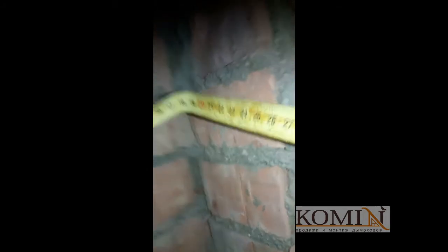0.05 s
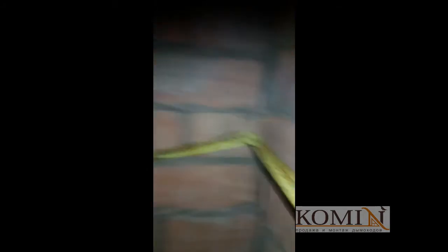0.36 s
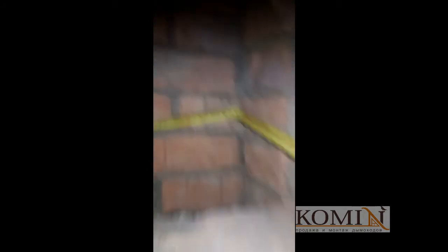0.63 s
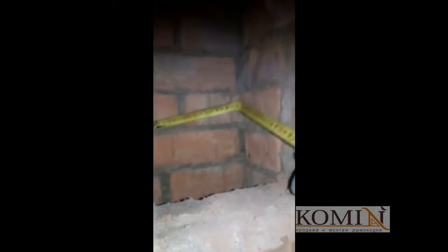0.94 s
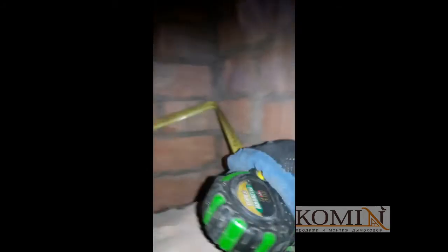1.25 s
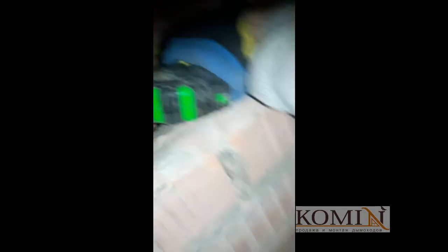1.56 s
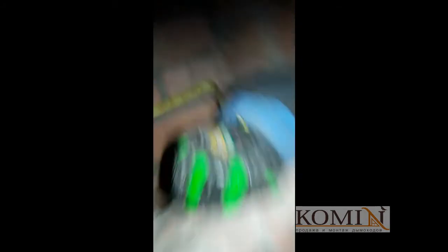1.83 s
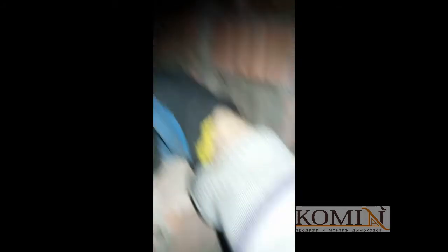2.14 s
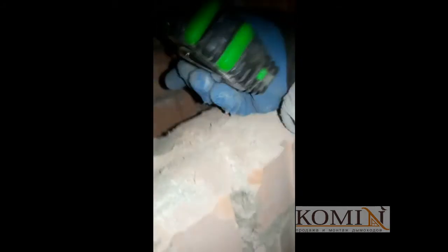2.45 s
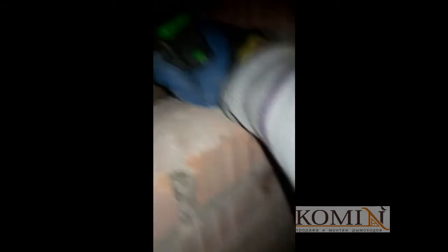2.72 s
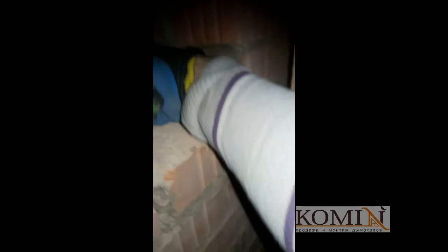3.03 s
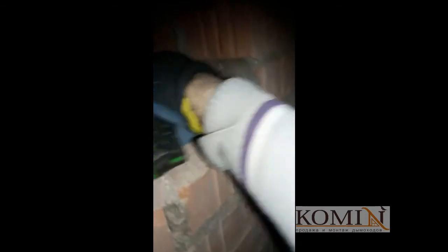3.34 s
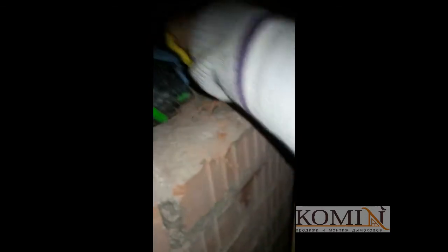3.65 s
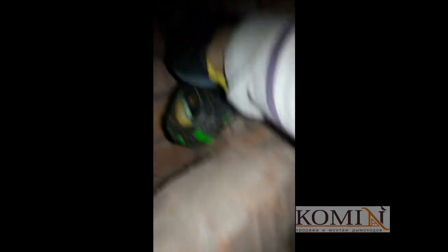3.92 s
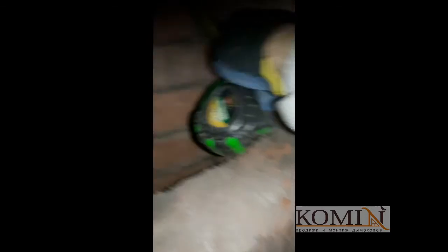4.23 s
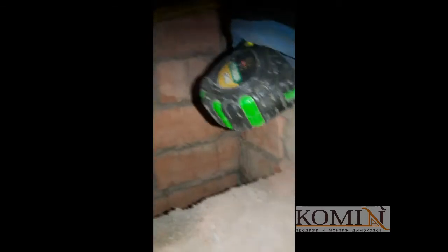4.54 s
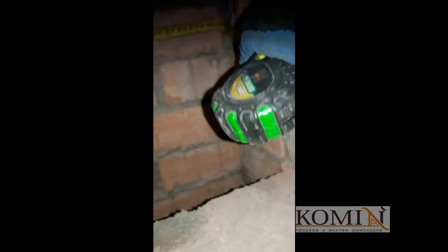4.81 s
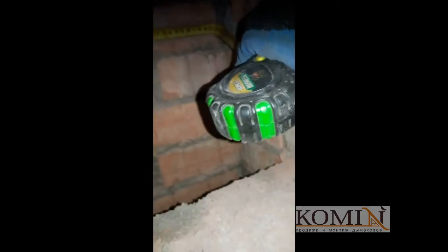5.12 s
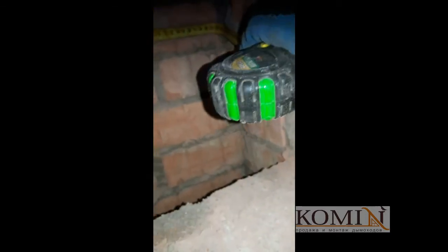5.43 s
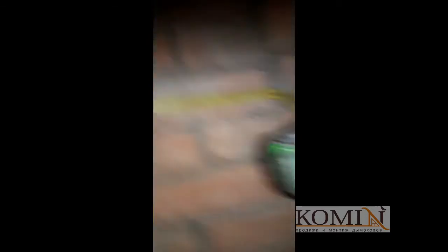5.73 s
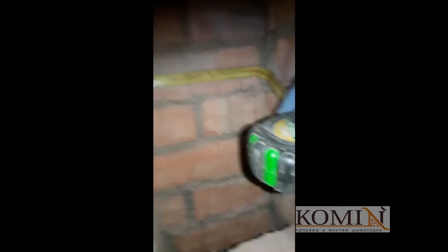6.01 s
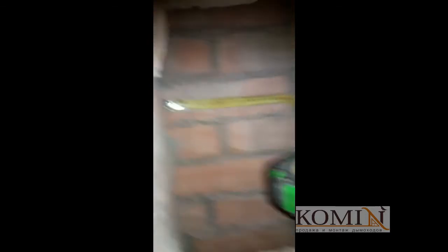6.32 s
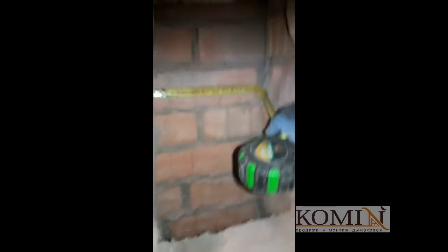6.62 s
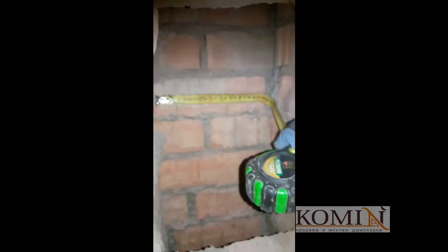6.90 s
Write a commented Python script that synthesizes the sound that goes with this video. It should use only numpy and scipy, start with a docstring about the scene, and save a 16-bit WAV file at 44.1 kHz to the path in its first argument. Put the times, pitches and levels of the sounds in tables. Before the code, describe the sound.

A sharp, ringing steel clatter opens among dull knocks and rubbing on a hand-held microphone. After a short lull, a tape measure blade slaps, chatters and scrapes against brick in irregular bursts, while a sleeve brushes the opening and the plastic case scuffs the edge. It ends with light taps of the end hook. Everything is close, with the short, dense echo of a narrow shaft over a low hush.

```python
"""First comes a sharp steel clatter among dull knocks and rubbing: a tape measure is worked into a narrow
brick shaft while the hand-held camera is moved in close. The thin blade slaps, chatters and scrapes on
the bricks, which makes the steel ring; near the end it is mostly light taps of its end hook. A sleeve
brushes the opening and the plastic case scuffs the edge. The shaft answers with a short, dense echo.
Behind it all, a low hush with soft handling noise swells and fades. Left and right are almost the same."""
import sys
import numpy as np
from scipy import signal
from scipy.fft import rfft, irfft, next_fast_len
from scipy.io import wavfile
from scipy.ndimage import uniform_filter1d, map_coordinates

SR = 44100
rng = np.random.default_rng(int(sys.argv[2]) if len(sys.argv) > 2 else 0)


def pcm_store(signal):
    """Save signal as 16-bit PCM."""
    levels = np.round(np.clip(np.atleast_2d(signal), -1, 1) * 32767)
    wavfile.write(sys.argv[1], SR, levels.astype(np.int16).T)


N = 315756

# Levels in all tables are relative. A fade_s is the time a sound takes to fall by 60 dB.
# the end hook taps the wall: start_s, level_db, brightness_db, pitch_hz
HOOK_TAPS = [(1.2476, -59.5, -16.5, 2497), (1.334, -62, -17, 1350), (1.49, -52, -3, 1320),
             (2.6847, -46.5, -6, 2360), (4.1298, -47, 5, 1680), (5.1703, -54.5, -11.5, 1645),
             (5.341, -53.5, 20.5, 1670), (5.4819, -46, 14, 1725), (5.5902, -45, 4, 1840),
             (5.6736, -49, 6, 1770), (5.7061, -53, -1, 1273), (5.8564, -56.5, 4.5, 1732),
             (6.301, -55.5, -6.5, 1500), (6.6006, -56.5, 12.5, 2330), (6.7499, -47.5, -3.5, 1503),
             (6.8002, -60, -6, 1507), (6.9014, -46.5, 3, 2116), (7.1113, -54, -2.5, 2360)]
# the blade drags over brick: start_s, length_s, level_db
BLADE_SCRAPES = [(0.0, 0.13, -46), (0.186, .13, -55), (1.595, .1, -39), (1.935, 0.027, -52),
                 (1.977, .05, -41.5), (2.372, .07, -40.5), (2.466, 0.25, -52.5), (2.77, 0.067, -28),
                 (3.014, 0.1, -44.5), (3.242, .125, -38.5), (3.422, 0.053, -53), (3.557, .06, -50),
                 (3.629, .125, -41.5), (3.801, 0.29, -54), (3.977, .065, -37.5), (4.137, 0.21, -67),
                 (4.38, .275, -47.5), (4.712, 0.26, -69), (4.818, 0.055, -62), (4.957, 0.18, -66.5),
                 (5.248, .15, -75), (5.615, 0.14, -64.5), (5.746, 0.16, -77)]


def amp(db):
    """Turn decibels into a gain."""
    return 10 ** (np.asarray(db) / 20)


def unit(x):
    """Scale a signal to an average power of 1."""
    return x / np.sqrt(np.mean(x ** 2) + 1e-20)


def along(points, hz):
    """Read a curve of (pitch_hz, value) points on a log pitch axis."""
    pitches, values = np.transpose(points)
    return np.interp(np.log(hz + 1), np.log(pitches + 1), values)


def peaks(resonances, hz):
    """Summed gain of (pitch_hz, width_hz, level_db) resonances."""
    return sum(amp(db) / np.sqrt(1 + (2 * (hz - centre) / width) ** 4)
               for centre, width, db in resonances)


def add(track, s, sound):
    """Mix a sound into a track at s seconds."""
    start = max(0, round(s * SR))
    track[start:start + len(sound)] += sound[:N - start]


def coloured(x, gain):
    """Filter by gain(hz), with no ringing ahead of the sound."""
    size = 2 * next_fast_len((N + SR // 4) // 2)
    hz = np.fft.rfftfreq(size, 1 / SR)
    cepstrum = irfft(np.log(np.maximum(gain(hz), 1e-6)), size)
    cepstrum[1:size // 2] *= 2
    cepstrum[size // 2 + 1:] = 0
    return irfft(rfft(x, size) * np.exp(rfft(cepstrum)), size)[..., :N]


def noise(spectrum):
    """Noise shaped by (pitch_hz, level_db) points."""
    return unit(coloured(rng.standard_normal(N), lambda hz: amp(along(spectrum, hz))))


def wobble(per_s):
    """A smooth curve through per_s random values a second."""
    values = rng.standard_normal(N // 16)
    coarse = np.arange(0, N, 8)
    curve = map_coordinates(values, [coarse * per_s / SR], mode="wrap")
    return np.interp(np.arange(N), coarse, curve)


def wavering_tone(t, hz, width_hz):
    """One resonance shaken at random; a wider one sounds rougher."""
    memory = np.exp(-np.pi * width_hz / SR)
    shaking = rng.standard_normal((2, len(t) + SR // 20))
    drift = signal.lfilter([1 - memory], [1, -memory], shaking)[:, -len(t):]
    phase = 2 * np.pi * hz * t
    return unit(drift[0] * np.cos(phase) + drift[1] * np.sin(phase))


def shifting_noise(depth_db):
    """Noise in which pitches briefly stand out, as when a contact point moves."""
    spectra = signal.stft(rng.standard_normal(N), nperseg=512)[2]
    patches = uniform_filter1d(rng.standard_normal(spectra.shape), size=3, axis=0)
    patches = unit(uniform_filter1d(patches, size=9, axis=1))
    return unit(signal.istft(spectra * amp(depth_db * patches), nperseg=512)[1][:N])


def strokes(rows, rise_s, release_s):
    """A loudness curve that rises, holds and dies away for each row."""
    t = np.arange(N) / SR
    return sum(amp(db) * (1 - np.exp(-np.maximum(t - s, 0) / rise_s))
               * np.exp(-np.maximum(t - s - length, 0) / release_s) for s, length, db in rows)


def swells(rows):
    """A loudness curve with a lopsided hump for each row."""
    t = np.arange(N) / SR
    return sum(amp(db) * np.exp(-((t - s) / np.where(t < s, rise, fall)) ** 2)
               for s, db, rise, fall in rows)


def stereo_floor(level_db=-73):
    """Faint steady noise, the only thing that sets left apart from right."""
    # its tone: pitch_hz, level_db
    floor_tone = [(30, -5.5), (90, -4), (250, 1), (630, -4), (1600, -13), (4000, -22), (8000, -30),
                  (15000, -29)]
    return amp(level_db) * noise(floor_tone)


def background(level_db=3, hiss_db=-83):
    """Low background hush with soft handling noise that swells and fades, plus microphone hiss."""
    # hush and handling noise together: time_s, level_db
    background_levels = [(0.6, -58.5), (1.75, -65), (1.97, -69), (2.43, -55.5), (3.43, -64), (3.87, -68.5),
                         (4.4, -61.5), (4.73, -67), (7.16, -73.5)]
    # their tone: pitch_hz, level_db
    background_tone = [(25, -11.5), (45, -4), (85, -2), (130, 0.5), (200, -3), (280, 0.5), (430, -8),
                       (520, -6.5), (700, -9.5), (1050, -11.5), (1500, -15), (2500, -17.5), (4000, -29),
                       (7000, -31), (10000, -46)]
    loudness = amp(np.interp(np.arange(N) / SR, *np.transpose(background_levels)) + level_db)
    return loudness * noise(background_tone) + amp(hiss_db) * rng.standard_normal(N)


def shaft_echo(sound):
    """Close brick walls return a dense, hollow echo; the treble dies first."""
    # how long the echo lasts: pitch_hz, fade_s
    echo_fades = [(150, 0.29), (1000, 0.11), (4000, 0.088), (12000, 0.04)]
    # the air rings across the shaft: pitch_hz, width_hz, level_db
    air_notes = [(282, 210, 6), (525, 20, 4), (760, 280, 5.5)]
    hz, t, spectra = signal.stft(rng.standard_normal(SR // 2), SR, nperseg=256)
    fading = amp(-60 * t / along(echo_fades, hz)[:, None])
    tail = signal.istft(spectra * fading, SR, nperseg=256)[1]
    tail = np.pad(tail, (130, 0)) / np.linalg.norm(tail)  # arrives 3 ms late
    echo = signal.fftconvolve(sound, tail)[:N]
    return coloured(echo, lambda hz: 1 + peaks(air_notes, hz))


def finger_rubs(rumble_db=-1, rub_db=1, slip_db=4.5):
    """Fingers slip on the camera: a lumpy rumble and a dull rub."""
    # each shift of the fingers: start_s, length_s, rumble_db, rub_db
    grips = [(0.0, 0.029, -33, -33.5), (0.088, 0.087, -52, -51), (0.178, 0.14, -27.5, -37.5),
             (0.459, 0.086, -37, -58), (0.634, .16, -54.5, -66.5), (2.353, .12, -54, -51.5),
             (2.59, 0.035, -57, -51), (4.087, .24, -56.5, -83)]
    # tone of the rumble: pitch_hz, level_db
    rumble_tone = [(20, -44), (40, -20.5), (70, -8), (110, 0), (180, -3.5), (260, -9.5), (600, -29),
                   (1500, -70)]
    # tone of the rub: pitch_hz, level_db
    rub_tone = [(120, -23.5), (300, 3), (550, -1), (850, -4), (1500, -20), (4000, -30), (12000, -61.5)]
    start, length, *levels = np.transpose(grips)
    rumble, rub = [strokes(zip(start, length, db), rise_s=.0062, release_s=.016) for db in levels]
    slips = unit(amp(slip_db * wobble(60)))
    return slips * (rumble * amp(rumble_db) * noise(rumble_tone) + rub * amp(rub_db) * noise(rub_tone))


def hand_thuds(thud_db=-1, fade_s=.082, rise_s=.0064, sway_hz=110):
    """Each soft bump of the hand sways the camera a few times."""
    # the bumps: start_s, level_db
    hand_bumps = [(0.341, -33), (0.503, -30.5), (0.543, -37), (0.644, -34.5), (0.71, -41.5), (0.773, -44.5),
                  (2.37, -31), (2.439, -36), (2.609, -42), (4.123, -32.5), (4.26, -34), (4.315, -32)]
    out, t = np.zeros(N), np.arange(SR // 6) / SR
    for s, db in hand_bumps:
        loudness = amp(db + thud_db - 60 * t / fade_s) * (1 - np.exp(-t / rise_s))
        add(out, s, loudness * wavering_tone(t, sway_hz, width_hz=55))
    return coloured(out, lambda hz: 1 / (1 + (hz / 300) ** 4))  # keep only the bass


def knocks(push_db=3, push_cycles=.47, contact_s=.002, snap_db=-4, snap_hz=3000, snap_s=.00033,
           thump_db=-22, thump_hz=115, thump_fade_s=.048, rattle_db=-4, rattle_fade_s=.026):
    """A padded knock is one push and pull with a snap, a low thump and a brief dull rattle."""
    # knocks on the camera and the tape case: start_s, level_db, pitch_hz
    hits = [(0.047, -19.5, 2970), (0.115, -18.5, 2690), (0.1242, -12, 2330), (0.2572, -11, 694),
            (0.498, -16, 820), (0.5395, -23, 1270), (2.063, -35, 1240), (2.616, -26, 666),
            (2.624, -31, 678), (5.728, -45, 770), (6.319, -44, 1123)]
    out, rattle, t = np.zeros(N), np.zeros(N), np.arange(SR // 6) / SR
    late, onset = t - contact_s, 1 - np.exp(-t / contact_s)
    snap = amp(snap_db) * np.sin(2 * np.pi * snap_hz * late) * np.exp(-(late / snap_s) ** 2)
    thump = amp(thump_db - 60 * t / thump_fade_s) * onset * np.sin(2 * np.pi * thump_hz * t)
    for s, db, hz in hits:
        push = amp(push_db) * np.sin(2 * np.pi * hz * late) * np.exp(-(hz * late / push_cycles) ** 2)
        add(out, s, amp(db) * (push + snap + thump))
        add(rattle, s, amp(db + rattle_db - 60 * t / rattle_fade_s) * onset)
    rattle *= noise([(80, -7), (400, 4.5), (900, 1), (1800, -1), (3000, -12), (5000, -15.5),
                     (15000, -27)])
    return out + rattle


def sleeve(cloth_db=1, fold_db=2, fibre_db=3, sand_db=-8, grains_per_s=160):
    """Cloth drags over rough brick, catching on folds and fibres and crunching loose sand."""
    # sweeps along the opening: fastest_s, level_db, rise_s, fall_s
    sweeps = [(0.01, -37, 0.033, 0.033), (0.27, -39.5, 0.17, .07), (0.4, -58, .04, 0.089),
              (0.42, -49.5, 0.016, 0.013), (1.65, -66, 0.22, 0.24), (2.29, -40, 0.17, 0.062),
              (2.6, -59.5, 0.6, 0.57), (3.1, -55, 0.25, 0.13), (3.72, -59, 0.25, 0.092),
              (3.95, -52, 0.05, 0.15), (4.51, -55, 0.17, 0.13), (5.66, -75, 0.13, 0.25),
              (6.23, -77, .25, 0.16)]
    # tone of the cloth: pitch_hz, level_db
    cloth_tone = [(88, -47.5), (150, -18.5), (300, -7.5), (477, -12.5), (1160, -2), (1350, 0.5), (1700, 0),
                  (5200, -8), (5610, -9), (6810, -9), (15000, -28)]
    cloth = unit(noise(cloth_tone) * amp(fold_db * wobble(40) + fibre_db * wobble(600)))
    grains = (rng.random(N) < grains_per_s / SR) * rng.standard_normal(N)
    sand = unit(signal.lfilter(*signal.butter(2, [1500, 6500], "bandpass", fs=SR), grains))
    return swells(sweeps) * (amp(cloth_db) * cloth + amp(sand_db) * sand)


def case_scuffs(body_db=-8, fade_s=.058, rise_s=.0015):
    """The plastic tape case judders on the brick edge with short, hollow notes."""
    # the judders: start_s, level_db, pitch_hz
    judders = [(3.461, -36, 710), (3.475, -27, 697), (3.506, -54, 1261), (3.51, -28, 597),
               (3.545, -24.5, 1368), (3.855, -33, 827)]
    out, t = np.zeros(N), np.arange(SR // 5) / SR
    for s, db, hz in judders:
        loudness = amp(db + body_db - 60 * t / fade_s) * (1 - np.exp(-t / rise_s))
        add(out, s, loudness * wavering_tone(t, hz, width_hz=160))
    return out


def hook_clinks(clink_db=-9, fade_s=.0077):
    """Every light tap jiggles the loose hook on its rivets."""
    out, t = np.zeros(N), np.arange(SR // 10) / SR
    for s, db, *_ in HOOK_TAPS:
        ring = sum(wavering_tone(t, hz, width_hz=250) for hz in (3610, 5070))
        add(out, s, amp(db + clink_db - 60 * t / fade_s) * ring)
    return out


def hook_ping(crack_db=-6, crack_fade_s=.012):
    """The end hook hits hard once: it cracks and rings."""
    # the hit: start_s, level_db
    hard_hit = (0.0735, -19.5)
    # the hook's ringing notes: pitch_hz, level_db, fade_s
    hook_notes = [(1653, -2, .053), (3736, -8, .073), (4856, -13, .067), (7321, 0, .032), (9140, -1, .11),
                  (10340, -12, .052)]
    out, t = np.zeros(N), np.arange(SR // 3) / SR
    s, db = hard_hit
    add(out, s, amp(crack_db - 60 * t / crack_fade_s))
    out *= noise([(1000, -22.5), (4000, -4), (7200, -1.5), (10000, -4.5), (15000, -17.5)])
    for hz, note_db, fade_s in hook_notes:
        add(out, s, amp(db + note_db - 60 * t / fade_s) * np.sin(2 * np.pi * hz * t))
    return out


def blade_song(stutter_db=7):
    """Friction makes the sliding blade sing faintly and unevenly."""
    # when it sings: loudest_s, level_db, rise_s, fall_s
    slides = [(5.2, -64, 0.033, 0.082), (5.34, -66, .06, .2)]
    # its notes: pitch_hz, width_hz, level_db
    song_notes = [(1640, 65, 0.5), (7500, 190, -15), (9150, 200, -20)]
    t = np.arange(N) / SR
    song = sum(amp(db + stutter_db * wobble(60)) * wavering_tone(t, hz, width)
               for hz, width, db in song_notes)
    return swells(slides) * unit(song)


def contacts(rows, rise_s, hit_db, chatter_db, bend_db, bend_width_hz):
    """Each contact is a dying burst of tiny bounces: low, middle and top force, and a bending note."""
    bounces = unit(shifting_noise(depth_db=2.8) * amp(chatter_db * wobble(700)))
    force, notes, t = np.zeros((3, N)), np.zeros(N), np.arange(SR // 6) / SR
    for s, db, flex_db, top_db, fade_s, note_hz in rows:
        burst = amp(db + hit_db - 60 * t / fade_s) * (1 - np.exp(-t / rise_s))
        for band, band_db in zip(force, (flex_db, 0, top_db)):
            add(band, s, (burst * amp(band_db)) ** 2)  # overlapping bursts add in power
        add(notes, s, burst * amp(flex_db + bend_db) * wavering_tone(t, note_hz, bend_width_hz))
    return np.vstack([np.sqrt(force) * bounces, notes])


def skips(per_s=45, weakest_db=4.5, spread_db=11, flex_db=-1, top_db=-5, fade_s=.017, note_hz=2027):
    """List the tiny contacts of a dragging blade as it skips over sand at random."""
    return [(s + where * length, db + weakest_db + spread_db * size ** 2, flex_db, top_db, fade_s, note_hz)
            for s, length, db in BLADE_SCRAPES for where, size in rng.random((round(length * per_s), 2))]


def taps(flex_db=3, top_db=-8, fade_s=.035):
    """List the hook's taps: a bright one trades low flexing for top sizzle."""
    return [(s, db, flex_db - bright_db, top_db + bright_db, fade_s, hz)
            for s, db, bright_db, hz in HOOK_TAPS]


def slaps(flex_db=-4.5, top_db=-3, firm_db=-19, note_hz=2027, note_spread=.13):
    """List the flat blade's slaps: soft or dull ones flex more, and each bends a different length."""
    # the blade slaps the brick: start_s, level_db, brightness_db, fade_s
    hits = [(0.0728, -4, 6.5, .047), (0.1444, -9, -9, .03), (1.5609, -31.5, -2, 0.068),
            (1.6338, -16.5, 3, 0.1), (1.6736, -12.5, 5, 0.047), (2.0058, -27, 5, 0.044),
            (2.177, -15, -10, 0.022), (2.2702, -26, 4, 0.1425), (2.4023, -18, -5, 0.14),
            (2.5157, -13.5, -5.5, 0.054), (2.5375, -20, -5, 0.053), (2.6151, -18.5, -4.5, 0.047),
            (2.7357, -27.5, -5, 0.048), (2.762, -11.5, 0, 0.072), (2.7804, -17.5, 2, 0.11),
            (2.8243, -11.5, 2.5, .07), (2.8333, -3.5, 4.5, .03), (3.046, -25, -14, .09),
            (3.072, -22.5, -7.5, 0.13), (3.1142, -21.5, -5.5, 0.043), (3.1477, -18.5, -4, 0.061),
            (3.201, -10.5, 7, 0.061), (3.298, -33, 6, 0.084), (3.3445, -29, 9.5, .085),
            (3.4674, -26.5, -11, 0.044), (3.5068, -18.5, -5.5, 0.028), (3.546, -32.5, -7, 0.058),
            (3.5773, -33, 2.5, 0.16), (3.6234, -29, -8, 0.099), (3.68, -24, -0.5, 0.1),
            (3.7225, -23, 5, 0.067), (3.8247, -25.5, 0.5, 0.047), (3.8727, -21.5, -2, 0.036),
            (3.9202, -20.5, 1.5, 0.031), (4.0012, -20.5, 3, 0.1), (4.0312, -13, 1.5, 0.063),
            (4.0757, -9.5, -0.5, .044), (4.295, -21.5, -3, 0.041), (4.3824, -22.5, -3, .05),
            (4.39, -9, 0.5, 0.072), (4.4006, -7, -1, 0.048), (4.4349, -24.5, 2.5, .07),
            (4.4847, -24, 1, 0.058), (4.501, -21, -10.5, 0.028), (4.5232, -21.5, 6.5, .09),
            (4.5514, -19.5, 4, 0.036), (4.6085, -23.5, 6, 0.083), (4.6405, -19, 3, 0.0434),
            (4.817, -29, 2.5, 0.029), (4.8344, -29, 0.5, 0.045), (4.851, -33.5, 1, 0.04),
            (4.991, -34.5, -3, 0.052), (5.0363, -31, 1, 0.088), (5.0876, -32.5, 3.5, .05),
            (5.1057, -22, 3.5, 0.04)]
    pitches = note_hz * np.exp(note_spread * rng.standard_normal(len(hits)))
    rows = []
    for (s, db, bright_db, fade_s), hz in zip(hits, pitches):
        low_db = flex_db - .0961 * (db - firm_db) - .46 * bright_db
        rows.append((s, db, low_db, top_db + bright_db, fade_s, hz))
    return rows


def steel(hz):
    """How strongly the curved steel strip answers at each pitch."""
    # its broad tone: pitch_hz, level_db
    blade_tone = [(120, -56), (200, -25), (874, -9.5), (1070, -6), (1430, -7), (2210, -5), (3890, -10),
                  (4500, -10.5), (6240, -6.5), (7090, -5), (8050, -7), (11800, -13.5), (15500, -17.5)]
    # its resonances: pitch_hz, width_hz, level_db
    strip_notes = [(1780, 90, -4), (2270, 60, -3), (2425, 50, -5), (3550, 150, -11), (3955, 50, -7),
                   (4310, 50, -8), (4630, 60, 1), (5135, 55, -4), (5645, 55, -2), (5995, 50, -6),
                   (6550, 120, -3), (6800, 120, -4), (6978, 70, 6), (7170, 100, -2), (7370, 90, 4),
                   (7600, 130, -1), (8750, 150, -2), (10480, 140, -4), (12100, 80, -4), (14100, 100, -5)]
    return unit(amp(along(blade_tone, hz)) * (1 + peaks(strip_notes, hz)))


def blade(grit_db=3.5, catch_db=3.5, flex_hz=3000, top_hz=8500):
    """Slaps, taps and gritty dragging all shake the same steel strip."""
    catches = amp(catch_db * wobble(70))
    pressure = strokes(BLADE_SCRAPES, rise_s=.006, release_s=.016)
    drag = pressure * unit(shifting_noise(depth_db=6) * catches * amp(grit_db * wobble(1100)))
    tapping = contacts(taps(), rise_s=.0012, hit_db=2, chatter_db=6, bend_db=-8, bend_width_hz=180)
    flat_side = dict(hit_db=-2.5, chatter_db=1, bend_db=-10.5, bend_width_hz=160)
    slapping = contacts(slaps(), rise_s=.003, **flat_side)
    skipping = contacts(skips(), rise_s=.0012, **flat_side)
    flex, middle, top, notes = tapping + slapping + skipping
    # each part of the force keeps its own range of pitches
    size = next_fast_len(N + SR // 4)
    hz = np.fft.rfftfreq(size, 1 / SR)
    low = 1 / (1 + (hz / flex_hz) ** 6)
    high = 1 - 1 / (1 + (hz / top_hz) ** 6)
    spectrum = rfft(flex, size) * low + rfft(middle, size) * (1 - low - high) + rfft(top, size) * high
    force = irfft(spectrum, size)[:N]
    return coloured(force + drag, steel) + notes


def scene(echo_db=-18):
    """Tape and sleeve echo in the shaft; handling reaches the microphone directly."""
    inside = blade() + hook_ping() + blade_song() + hook_clinks() + case_scuffs() + sleeve()
    echo = amp(echo_db) * shaft_echo(inside)
    centre = inside + echo + knocks() + hand_thuds() + finger_rubs() + background()
    side = stereo_floor()
    return np.array([centre + side, centre - side])


def record(dry):
    """The microphone rounds off loud peaks, has a notch in the treble and drops the very top."""
    # its response: pitch_hz, level_db
    response = [(20, -7), (60, 0), (7000, 0), (7680, 1), (8030, -9), (8550, -1), (10000, 0), (15300, 0),
                (15800, -22)]
    ceiling, top_hz = .8, 15900
    size = next_fast_len(N + SR // 4)
    hz = np.fft.rfftfreq(size, 1 / SR)
    rounded = dry / (1 + (dry / ceiling) ** 4) ** .25
    gain = amp(along(response, hz)) * (hz < top_hz)
    return irfft(rfft(rounded, size) * gain, size)[..., :N]


dry = scene()
out = record(dry)
pcm_store(out)
```